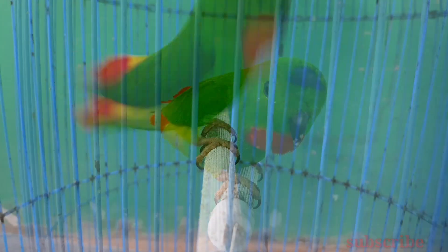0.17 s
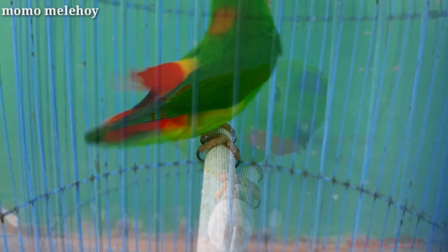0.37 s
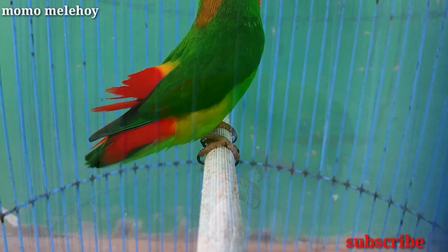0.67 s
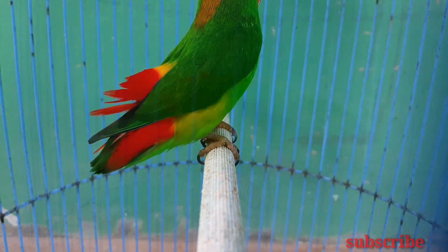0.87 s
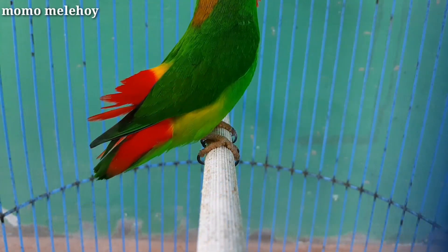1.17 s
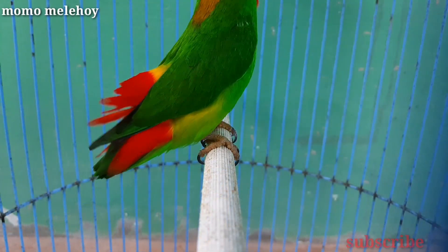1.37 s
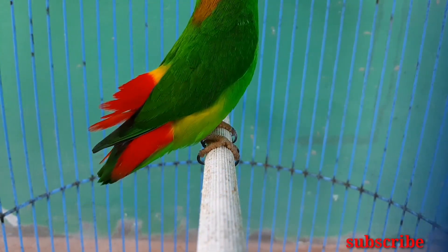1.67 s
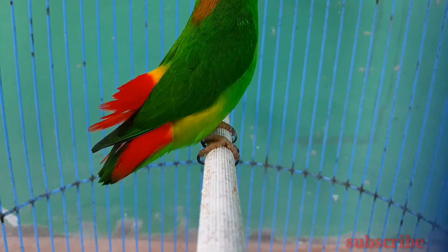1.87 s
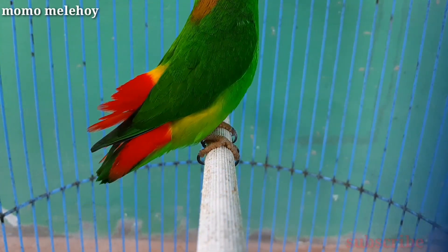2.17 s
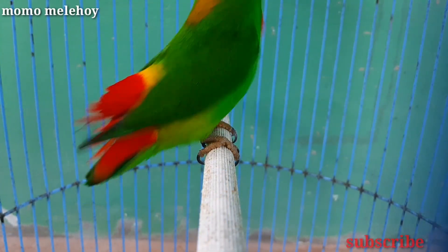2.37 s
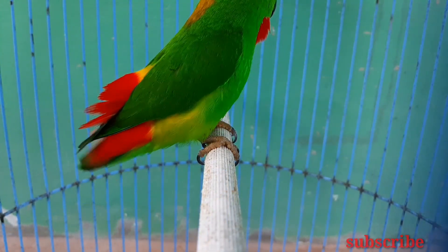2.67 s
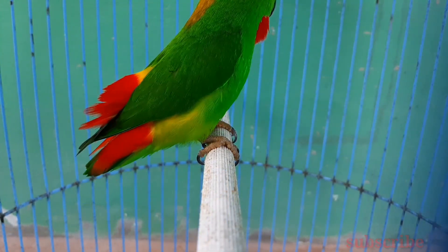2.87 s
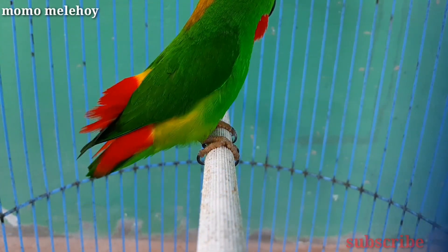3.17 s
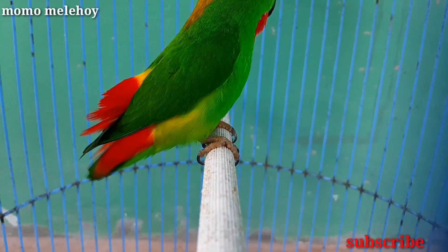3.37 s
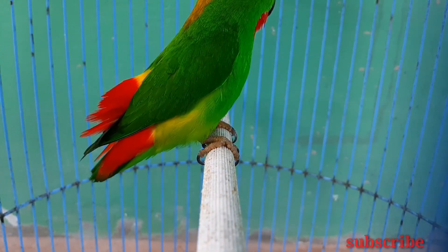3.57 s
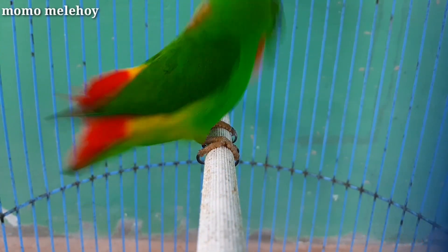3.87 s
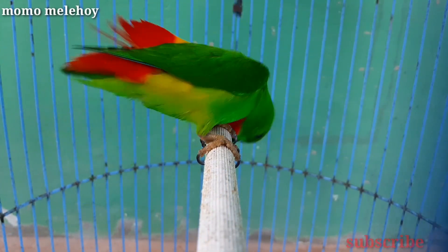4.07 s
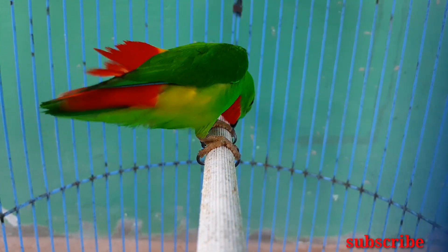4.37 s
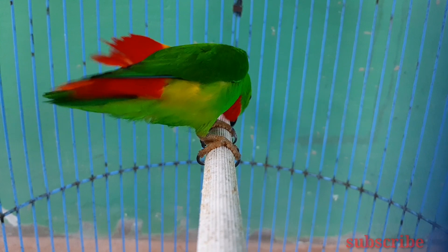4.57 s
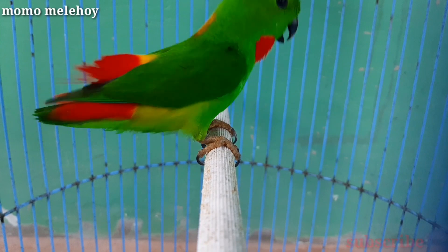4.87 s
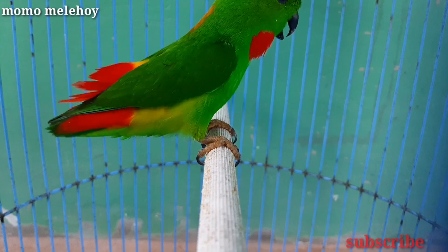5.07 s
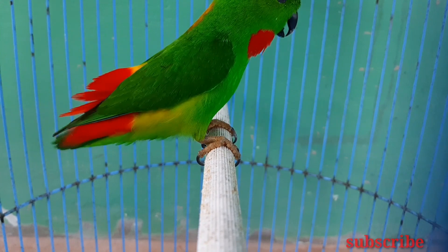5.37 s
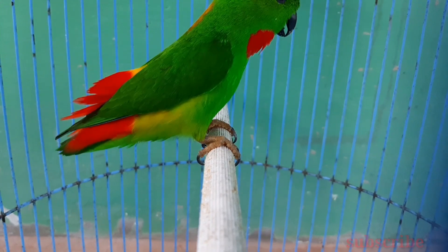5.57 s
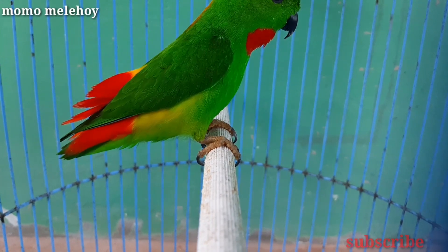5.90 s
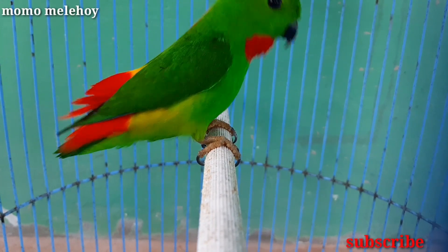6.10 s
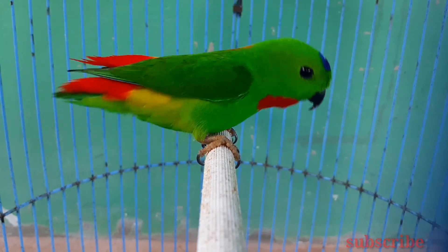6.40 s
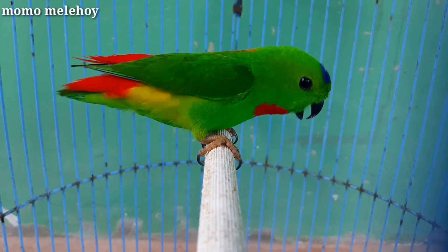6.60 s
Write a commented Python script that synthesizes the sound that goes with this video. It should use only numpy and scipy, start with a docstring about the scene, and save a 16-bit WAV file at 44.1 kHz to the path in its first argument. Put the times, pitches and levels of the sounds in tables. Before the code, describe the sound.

Shrill zigzag chirps and three harsh, buzzing squeals from a little parrot close by in a small room, with soft peeps and slight rustling between.

```python
"""A small hanging parrot sings on its perch in a wire cage, close to a pair of microphones in a small room.
Over a steady hiss, a fading engine and rumble, come a twitter, hoarse rasps, a chip, two more twitters and a
whistle. Two buzzy squeals near 7 kHz follow, each answered by two twitters, with chips, a shuffle and soft
peeps between. After two more peeps and a chip, a third squeal closes. Calls are near sines from a fluttering
membrane, plus air noise; the loudest notes overload the microphones, and this distortion adds a low flutter and
an octave."""
import sys
import numpy as np
from scipy import signal
from scipy.fft import rfft, irfft
from scipy.io import wavfile

SR = 44100
rng = np.random.default_rng(int(sys.argv[2]) if len(sys.argv) > 2 else 0)


def bounce(signal):
    """Save signal as a 16-bit WAV file at the path given by the first command-line argument."""
    frames = np.transpose(np.atleast_2d(signal))
    limited = np.clip(frames, -1, 1)
    pcm = np.round(limited * 32767).astype(np.int16)
    wavfile.write(sys.argv[1], SR, pcm)


N = 297234
TIME = np.arange(N) / SR
KHZ = 1000


def from_db(db):
    """Amplitude ratio: twenty decibels are a factor of ten."""
    return 10 ** (np.asarray(db) / 20)


def rms_one(x):
    """Normalization to unit root-mean-square."""
    return x / np.sqrt(np.mean(x ** 2) + 1e-20)


def butter(x, hz, kind, order=2):
    """Butterworth filtering: a maximally flat pass band."""
    return signal.sosfilt(signal.butter(order, hz, kind, fs=SR, output="sos"), x)


def swell(rows):
    """Amplitude envelope: linear in decibels between rows of (s, dB), silent outside them."""
    s, db = np.transpose(rows)
    return from_db(np.interp(TIME, s, db)) * (TIME >= s[0]) * (TIME <= s[-1])


def clock(start, length):
    """Local time: seconds since the start of a call, for as long as it lasts."""
    return TIME[(TIME >= start) & (TIME <= start + length)] - start


def envelope_db(t, length, attack, release):
    """Attack, hold and release: linear amplitude ramps, expressed in decibels."""
    return 20 * np.log10(np.clip(np.minimum(t / attack, (length - t) / release), 1e-6, 1))


def drift(rate_hz, size):
    """Random modulation: noise low-passed at the given rate, with unit spread."""
    lead_in = SR // 10
    return rms_one(butter(rng.standard_normal(size + lead_in), rate_hz, "low")[-size:])


def noise(spectrum, likeness=0, size=N):
    """Spectral shaping: stereo noise of rms 1, its left-right correlation set by mid and side shares."""
    hz, db = np.transpose(spectrum)
    bins = np.maximum(np.fft.rfftfreq(size, 1 / SR), 1)
    gain = from_db(np.interp(np.log(bins), np.log(hz), db)) * (bins > hz[0] / 2)
    mid, side = irfft(rfft(rng.standard_normal((2, size))) * gain, size)
    return rms_one(np.sqrt(1 + likeness) * mid + np.sqrt(1 - likeness) * side * [[1], [-1]])


# The colour of hoarse air in the throat. Each row: frequency in Hz, relative level in dB per Hz.
AIR_SPECTRUM = [(710, -64.5), (1200, -30), (2560, -16.5), (2830, -9), (4600, -14), (5900, -1.5), (7820, 0),
                (9930, -18.5), (11100, -7.5), (16000, -48.5)]


def syrinx(start, hz, db, buzz, under_db, over_db, air_db, flicker_db=0, under_spread_hz=700,
           buzz_hz=370, buzz_depth=1.97, jitter=0.013, throb=0.076):
    """Self-oscillation: the membrane sings a near sine; when pushed it flutters and throws sidebands."""
    t = TIME[:len(hz)]

    def chance(rate_hz):
        return drift(rate_hz, size=SR // 2)[:len(t)]

    flutter = 2 * np.pi * np.cumsum(buzz_hz * (1 + .17 * chance(90))) / SR
    hz = hz * (1 + jitter * buzz * chance(380))
    phase = 2 * np.pi * np.cumsum(hz) / SR + buzz_depth * buzz * np.sin(flutter)
    # the throat passes 7 kHz best, so the overtone stands out more when the pitch drops
    overtone_gain = from_db(over_db) * (7000 / np.maximum(hz, 5100)) ** 11.36
    overtone = overtone_gain * np.sin(2 * phase)
    # unevenly alternating swings leave a smeared band an octave below, and a weaker one a fifth above
    slip = phase / 2 + 2 * np.pi * np.cumsum(under_spread_hz * chance(1500)) / SR
    undertone = from_db(under_db) * (np.sin(slip) + np.sin(phase + slip) / 2)
    # rough stretches break up in level and let air through
    flicker = flicker_db * np.tanh(4 * buzz) * chance(120)
    level = from_db(db + flicker) * (1 + throb * buzz * np.cos(flutter))
    air_level = from_db(air_db + db / 2 + 6.6 * chance(180)) * buzz
    air = air_level * noise(AIR_SPECTRUM, size=SR // 2)[0, :len(t)]
    edges = np.clip(np.minimum(t, t[-1] - t) / 0.0024, 0, 1)
    voice = np.sqrt(2) * level * (np.sin(phase) + overtone + undertone) + air
    out, first = np.zeros(N), np.searchsorted(TIME, start)
    out[first:first + len(t)] = edges * voice
    return out


# The arch that opens a twitter. Each row: seconds from its start, pitch in Hz.
ARCH_PITCH = [(0, 2870), (0.015, 5800), (0.044, 6230), (0.063, 7175), (.076, 7247), (0.086, 6840)]
# The zigzag that closes it in an upward flick. Each row: seconds from the flick, pitch in Hz before hoarseness.
ZIGZAG_PITCH = [(-.064, 6100), (-.053, 4600), (-.039, 6407), (-.025, 5000), (-.011, 6720), (-.005, 5600),
                (0, 7708), (.01, 8158)]
# The twitters. Each row: start in seconds, flick in seconds, arch level in dB, flick level in dB,
# extra pitch after the flick in Hz, hoarseness from 0 to 1.
TWITTER_CALLS = [(-.004, 0.159, -33.5, -26.5, -220, 0.09), (0.609, 0.739, -29.5, -14, 159, 0.1),
                 (0.821, 0.952, -30.5, -15, -6, 0.2), (2.829, 2.991, -13.5, -4.5, 42, 0.11),
                 (3.082, 3.243, -15, -9, -170, 0.05), (5.263, 5.421, -17, -5, 28, 0.09),
                 (5.521, 5.68, -17.5, -11, -140, 0.11)]
# a twitter is loudest and cleanest at the top of each rise
ARCH_DB_PER_KHZ, ARCH_RANGE_DB = 13, 22.5
ZIGZAG_DB_PER_KHZ, ZIGZAG_GROWTH_DB_PER_S = 7, 176.5
ARCH_ATTACK_S, FLICK_RELEASE_S = 0.0013, 0.0059
CLEAN_ABOVE_HZ, BUZZ_PER_KHZ, MOST_PITCH_BUZZ = 6700, .25, 0.67
HOARSE_LIFT, LOW_NOTE_HZ, LOW_NOTE_DB_PER_KHZ = 0.95, 5120, 1.5


def twitter(start, flick, arch_db, flick_db, flick_hz, hoarse):
    """Frequency modulation: an arch, a growing zigzag and a flick; a hurried one skips the first turns."""
    arch, zigzag = np.array(ARCH_PITCH), np.add(ZIGZAG_PITCH, [flick - start, 0])
    arch_end = arch[-1, 0]
    length, top_hz = zigzag[-1]
    t = clock(start, length)
    turns = np.vstack([arch, zigzag[zigzag[:, 0] > arch_end]])
    hz = np.interp(t, *turns.T)
    to_flick = flick - start - t
    # a hoarse twitter makes shallower turns
    hz = hz + hoarse * HOARSE_LIFT * np.maximum(top_hz - hz, 0) * t / length
    arch_drop = ARCH_DB_PER_KHZ * (arch[:, 1].max() - hz) / KHZ
    in_arch = arch_db - np.minimum(arch_drop, ARCH_RANGE_DB)
    in_zigzag = flick_db - ZIGZAG_DB_PER_KHZ * (top_hz - hz) / KHZ
    in_zigzag = in_zigzag - ZIGZAG_GROWTH_DB_PER_S * np.maximum(to_flick, 0)
    # the lowest notes of the arch are the faintest
    in_arch = in_arch - LOW_NOTE_DB_PER_KHZ * np.maximum(LOW_NOTE_HZ - hz, 0) / KHZ
    handover = np.clip((t - arch_end) / 0.036, 0, 1)
    db = (1 - handover) * in_arch + handover * in_zigzag
    db = db + envelope_db(t, length, ARCH_ATTACK_S, FLICK_RELEASE_S)
    buzz = hoarse + np.clip(BUZZ_PER_KHZ * (CLEAN_ABOVE_HZ - hz) / KHZ, 0, MOST_PITCH_BUZZ)
    return syrinx(start, hz + flick_hz * (to_flick < 0), db, buzz, under_db=-42, over_db=-22.5,
                  air_db=-29.5, flicker_db=4.0, buzz_depth=1.54, jitter=.06)


# A distant engine slowing down. Each row: time in seconds, speed in turns per second, level in dB.
ENGINE_SPEED = [(0, 34.16, -47.5), (0.348, 32.07, -52), (0.899, 28.13, -59.5), (1.4, 26.1, -100)]
# Its harmonics. Each row: multiple of the turning rate, relative level in dB.
ENGINE_HARMONICS = [(2, -1.5), (4, -2.5), (5, -2.5)]


def engine():
    """Harmonic series: each engine order is a sine at a whole multiple of the turning rate."""
    s, speed, db = np.transpose(ENGINE_SPEED)
    turns = 2 * np.pi * np.cumsum(np.interp(TIME, s, speed)) / SR
    orders = sum(from_db(level) * np.sin(k * turns) for k, level in ENGINE_HARMONICS)
    return np.sqrt(2) * swell(np.transpose([s, db])) * orders


# The colour of the steady background hiss. Each row: frequency in Hz, relative level in dB per Hz.
HISS_SPECTRUM = [(15, -61), (25, -28.5), (102, -7), (175, -15), (229, -24.5), (301, -29.5), (450, -37.5),
                 (591, -31), (659, -44.5), (3160, -56), (5000, -39.5), (5730, -55.5), (6920, -26.5),
                 (7700, -41.5), (9500, -57), (11000, -47), (16000, -71.5)]
HISS_DB = -56.5
# The colour of a rumble. Each row: frequency in Hz, relative level in dB per Hz.
RUMBLE_SPECTRUM = [(45, 2), (110, 7.5), (2500, -36)]
# The strength of the rumble. Each row: time in seconds, level in dB.
RUMBLE_ENVELOPE = [(0, -53), (.75, -50), (1.4, -73.5)]


def hush():
    """Filtered noise: a steady background hiss and a low rumble that swells slightly and fades."""
    steady = from_db(HISS_DB) * noise(HISS_SPECTRUM, likeness=0.11)
    return steady + swell(RUMBLE_ENVELOPE) * noise(RUMBLE_SPECTRUM, likeness=0.033)


# The hoarse rasps. Each row: start in seconds, length in seconds, level in dB.
RASP_CALLS = [(.388, .35, -45), (.828, .14, -51)]
RASP_ATTACK_S, RASP_RELEASE_S, RASP_FADE_DB_PER_S = 0.032, .04, 0.5


def rasp(grain_db=3.0):
    """Turbulence: long hoarse hisses of air in uneven spurts."""
    level = 0
    for start, length, db in RASP_CALLS:
        t = TIME - start
        shape_db = envelope_db(t, length, RASP_ATTACK_S, RASP_RELEASE_S)
        level = level + from_db(db + shape_db - RASP_FADE_DB_PER_S * np.abs(t))
    return level * from_db(grain_db * drift(130, N)) * noise(AIR_SPECTRUM, likeness=-0.015)


# The chips. Each row: start in seconds, attack in seconds, rise in seconds, length in seconds, first pitch in Hz,
# top pitch in Hz, last pitch in Hz, peak level in dB, final buzz from 0 to 1, relative lower octave in dB.
CHIP_CALLS = [(.565, 0.017, .02, .043, 7010, 7830, 6200, -30, 0.06, -9),
              (3.463, 0.0095, 0.039, 0.063, 6126, 7206, 3586, -21.5, 0.53, -57.5),
              (3.971, 0.047, .028, .08, 2754, 6560, 5620, -42.5, 0.94, -21),
              (6.249, 0.012, 0.017, 0.062, 6280, 7034, 3830, -17.5, 0.43, -41.5)]
CHIP_FALL_S, CHIP_FADE_DB_PER_S = 0.018, 335


def chip(start, attack, rise, length, first_hz, top_hz, last_hz, peak_db, most_buzz, under_db):
    """Pitch gliding: a short note jumps up, holds and falls away, growing fainter and rougher."""
    t = clock(start, length)
    turns_s = [0, rise, max(rise, length - CHIP_FALL_S), length]
    hz = np.interp(t, turns_s, [first_hz, top_hz, top_hz, last_hz])
    db = peak_db + envelope_db(t, length, attack, 0.0033)
    db = db - CHIP_FADE_DB_PER_S * np.maximum(t - attack, 0)
    return syrinx(start, hz, db, most_buzz * t / length, under_db, over_db=-25.0,
                  air_db=-30.5, flicker_db=-1.5, under_spread_hz=90, jitter=0.074)


WHISTLE_START_S, WHISTLE_LENGTH_S = 1.238, .2
WHISTLE_HZ, WHISTLE_SCOOP_HZ, WHISTLE_SCOOP_S = 6440, 376.3, 0.039
WHISTLE_DB, WHISTLE_BUZZ = -17.5, 0.045
WHISTLE_ATTACK_S, WHISTLE_RELEASE_S = 0.0083, 0.0038


def whistle():
    """Exponential settling: a held note eases up to its pitch, with a slightly hoarse edge."""
    t = clock(WHISTLE_START_S, WHISTLE_LENGTH_S)
    hz = WHISTLE_HZ - WHISTLE_SCOOP_HZ * np.exp(-t / WHISTLE_SCOOP_S)
    db = WHISTLE_DB + envelope_db(t, WHISTLE_LENGTH_S, WHISTLE_ATTACK_S, WHISTLE_RELEASE_S)
    return syrinx(WHISTLE_START_S, hz, db, WHISTLE_BUZZ, under_db=-40, over_db=-29.5,
                  air_db=-26, flicker_db=-1, under_spread_hz=140, jitter=0.093)


# The squeals. Each row: start in seconds, length in seconds, pitch in Hz, scoop from below in Hz,
# added buzz at its peak from 0 to 1, seconds until the buzz peaks.
SQUEAL_CALLS = [(2.46, 0.259, 7379, 300, 0.15, 0.082), (4.895, .254, 7354, 695.4, 0.99, .055),
                (6.618, .125, 7220, 864, 1, 0.086)]
# The strength of each squeal, one list apiece. Each row: time in seconds, level in dB before SQUEAL_GAIN_DB.
SQUEAL_ENVELOPES = [
    [(2.458, -15), (2.464, -21), (2.47, -18.5), (2.484, -28.5), (2.5, -15.5), (2.546, -21), (2.554, -15),
     (2.616, -17.5), (2.634, -26), (2.696, -14.5), (2.71, -14.5), (2.716, -17)],
    [(4.897, -33), (4.903, -19), (4.943, -14.5), (4.949, -26.5), (4.979, -13), (4.985, -26), (5.049, -14.5),
     (5.085, -36.5), (5.121, -16), (5.131, -21), (5.141, -12), (5.15, -48)],
    [(6.62, -36), (6.626, -27.5), (6.646, -14), (6.68, -29.5), (6.698, -15.5), (6.71, -22.5), (6.74, -23)],
]
# Dives in pitch with recovery. Each row: centre in seconds, depth in Hz, half length in seconds.
PITCH_DIVES = [(2.478, 1400, 0.0082), (2.636, 2400, 0.017), (5.076, 2500, .022)]
SQUEAL_GAIN_DB, SCOOP_S, SAG_HZ_PER_S, LEAST_BUZZ = 6.5, .03, 1200, 0.065
DIVE_DB_PER_KHZ, DIVE_BUZZ_PER_KHZ = 3.5, 0.073


def squeal(start, length, pitch_hz, scoop_hz, most_buzz, buzz_peak_s, levels):
    """Onset of instability: a loud note scoops up and sags; its buzz swells and eases, its pitch may dive."""
    t = clock(start, length)
    dive = sum(depth * np.maximum(1 - np.abs(start + t - s) / half, 0) for s, depth, half in PITCH_DIVES)
    hz = pitch_hz - scoop_hz * np.exp(-t / SCOOP_S) - SAG_HZ_PER_S * t - dive
    db = SQUEAL_GAIN_DB + np.interp(start + t, *np.transpose(levels)) - DIVE_DB_PER_KHZ * dive / KHZ
    # rises to 1 at the peak time, then decays
    buzz_shape = (t / buzz_peak_s * np.exp(1 - t / buzz_peak_s)) ** 2
    buzz = LEAST_BUZZ + most_buzz * buzz_shape + DIVE_BUZZ_PER_KHZ * dive / KHZ
    return syrinx(start, hz, db, buzz, under_db=-47.5, over_db=-20.5, air_db=-37.5, flicker_db=2.5,
                  buzz_hz=417, buzz_depth=1.65, jitter=.025, throb=0.56)


# The strength of rustling feathers and feet. Each row: time in seconds, level in dB.
SHUFFLE_ENVELOPE = [(4.13, -62), (4.17, -60), (4.5, -58.5), (4.88, -69.5)]
# The colour of the rustle. Each row: frequency in Hz, relative level in dB per Hz.
FEATHER_SPECTRUM = [(200, 2.5), (1100, -24.5), (6000, -18), (15000, -26)]
# A claw on the perch. Each row: time in seconds, peak level in dB before the tick gain.
CLAW_TICKS = [(4.2331, -30.5)]


def perch(tick_s=0.027, tick_gain_db=-6, tick_fall_db=57.5):
    """Friction and impact: a shuffle in uneven brushes, and a claw tick as a decaying noise burst."""
    rustle = swell(SHUFFLE_ENVELOPE) * from_db(0.51 * drift(75, N)) * noise(FEATHER_SPECTRUM, likeness=0.095)
    tick = 0
    for s, db in CLAW_TICKS:
        peak_db = db + tick_gain_db
        tick = tick + swell([(s, peak_db), (s + tick_s, peak_db - tick_fall_db)])
    return rustle + butter(tick * rng.standard_normal((2, N)), 1800, "high")


# The soft peeps. Each row: start in seconds, level in dB.
PEEP_CALLS = [(4.367, -37.5), (4.571, -36), (5.836, -41), (6.047, -43)]
PEEP_S, PEEP_ATTACK_S, PEEP_BUZZ = 0.16, 0.034, 0.048
PEEP_HZ, PEEP_RISE_HZ, PEEP_GLIDE_AT_S, PEEP_GLIDE_S = 6386, 471, .078, .028


def peep(start, level_db):
    """Sigmoid glide: a soft note with a gentle attack slides from one pitch to a higher one."""
    t = clock(start, PEEP_S)
    glide = (1 + np.tanh((t - PEEP_GLIDE_AT_S) / PEEP_GLIDE_S)) / 2
    db = level_db + envelope_db(t, PEEP_S, PEEP_ATTACK_S, 0.011)
    return syrinx(start, PEEP_HZ + PEEP_RISE_HZ * glide, db, PEEP_BUZZ, under_db=-48.5,
                  over_db=-49.5, air_db=-50.0, flicker_db=24.5)


# A faint far tone. Each row: time in seconds, level in dB.
FAR_TONE_ENVELOPE = [(5.77, -87), (5.9, -72), (6.15, -100)]
FAR_TONE_HZ = 1350


def far_tone():
    """Random frequency modulation: a faint sine whose pitch wavers."""
    hz = FAR_TONE_HZ * (1 + 0.0076 * drift(51, N))
    return np.sqrt(2) * swell(FAR_TONE_ENVELOPE) * np.sin(2 * np.pi * np.cumsum(hz) / SR)


def song(thin_low_hz=8500, thin_high_hz=11200, thin_share=0.71):
    """Superposition: all voiced calls, summed; a partial band-stop thins the sound between song and overtone."""
    calls = sum(twitter(*row) for row in TWITTER_CALLS) + sum(chip(*row) for row in CHIP_CALLS)
    calls += whistle() + sum(peep(*row) for row in PEEP_CALLS)
    calls += sum(squeal(*row, levels) for row, levels in zip(SQUEAL_CALLS, SQUEAL_ENVELOPES))
    return calls - thin_share * butter(calls, [thin_low_hz, thin_high_hz], "band", order=1)


# The first echo off the cage, left then right microphone port. Each row: delay in seconds, relative level in dB.
PORT_ECHOES = [(.00125, -11), (.0021, -12.5)]
PORT_LAG_S = 4.7e-5


def cage(voice):
    """Propagation delay and reflection: the right port hears the voice later; each port has its own cage echo."""
    hz = np.fft.rfftfreq(N, 1 / SR)
    direct = np.exp(-2j * np.pi * hz * np.array([[0], [PORT_LAG_S]]))
    echoes = np.array([from_db(db) * np.exp(-2j * np.pi * hz * lag) for lag, db in PORT_ECHOES])
    return irfft(rfft(voice) * (direct + echoes), N)


ROOM_T60_S, TAIL_T60_S = 0.26, 0.51


def room(x, wet_db=-11, tail_db=-25, first_echo_s=0.0041):
    """Reverberation: dense echoes from cage and near walls, over a weaker, longer ring of the room."""
    t = TIME[:SR]
    response = 0
    for t60, level_db in ((ROOM_T60_S, wet_db), (TAIL_T60_S, tail_db)):
        echoes = rng.standard_normal((2, SR)) * 1000 ** (-t / t60) * (t > first_echo_s)
        response = response + from_db(level_db) * rms_one(echoes) / np.sqrt(SR)
    return signal.fftconvolve(x, response, axes=1)[:, :N]


# The bird turns its head. Each row: time in seconds, left minus right level in dB.
HEAD_TURNS = [(.95, 0.5), (1.3, -1), (2.5, -1), (2.62, -2), (2.68, -5), (2.9, -2), (4.95, 1), (5.1, -0.5),
              (5.4, 0)]


def scene():
    """Direct and diffuse fields: the bird in its cage at two ports, the room and the background around it."""
    pan = from_db(np.interp(TIME, *np.transpose(HEAD_TURNS)) * [[.5], [-.5]])
    bird = cage(song()) * pan + rasp() + perch()
    # the beak beams its highest tones; lower sound spreads and so excites the room more
    spread = from_db(17.5) * butter(bird, 3000, "low", order=4)
    return bird + room(bird + spread) + hush() + engine() + far_tone()


def record(dry, bend_left=0.42, bend_right=0.62, flutter_cut_hz=2100, octave_db=-7,
           dip_hz=9400, dip_share=0.42, top=0.99, cutoff_hz=15900):
    """Quadratic distortion: microphones bend loud notes; beats give low flutter, pitch an octave above."""
    # a dip just above the song
    heard = dry - dip_share * butter(dry, [dip_hz - 750, dip_hz + 750], "band", order=1)
    bent = -np.array([[bend_left], [bend_right]]) * heard ** 2
    flutter = butter(butter(bent, 85, "high", order=3), flutter_cut_hz, "low", order=1)
    octave = from_db(octave_db) * butter(bent, 11000, "high")
    out = top * np.tanh(heard / top) + flutter + octave
    # a steep low-pass ends the treble
    return signal.sosfilt(signal.ellip(10, .1, 80, cutoff_hz, fs=SR, output="sos"), out)


dry = scene()
out = record(dry)
bounce(out)
```